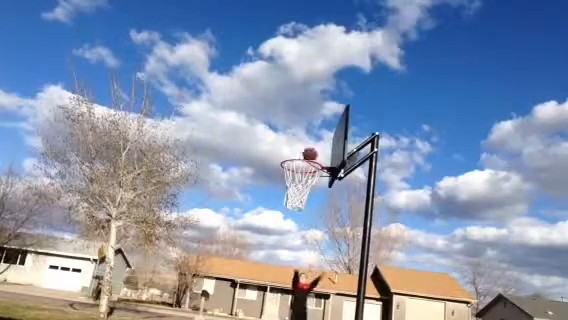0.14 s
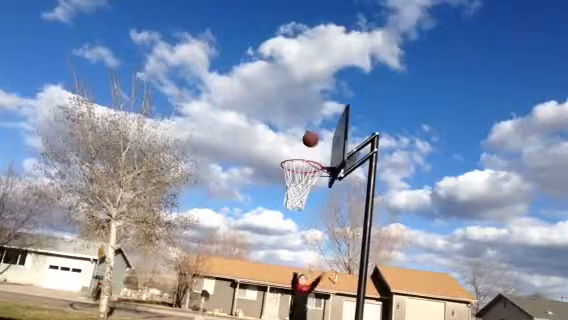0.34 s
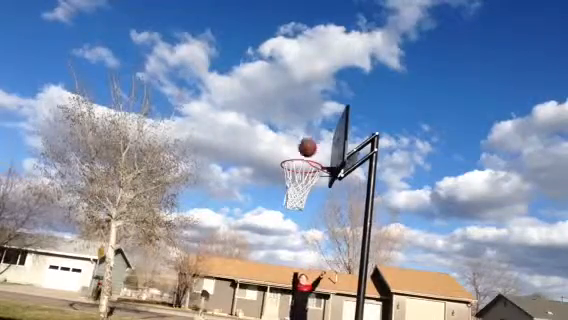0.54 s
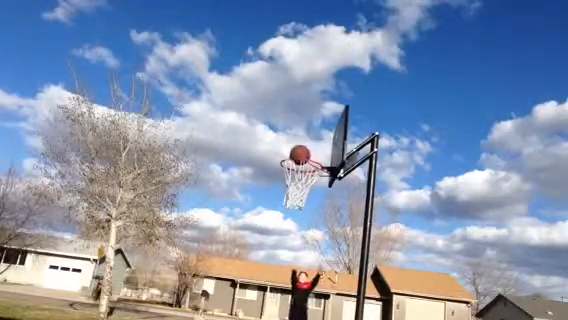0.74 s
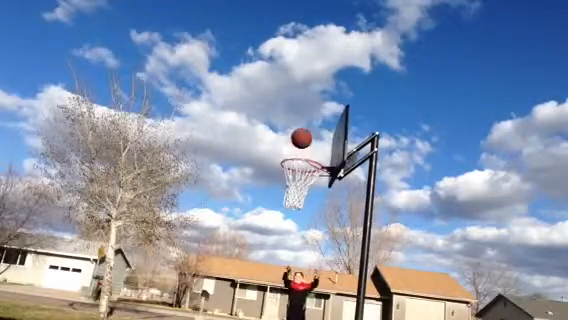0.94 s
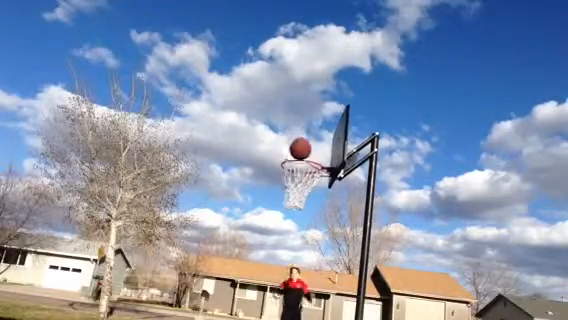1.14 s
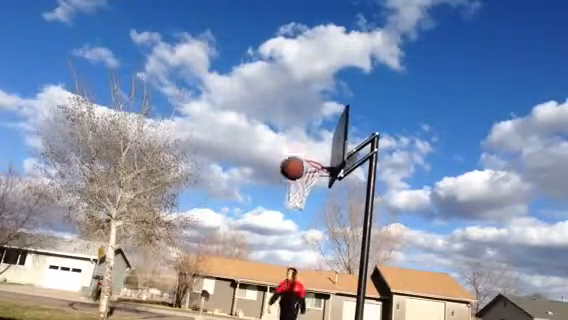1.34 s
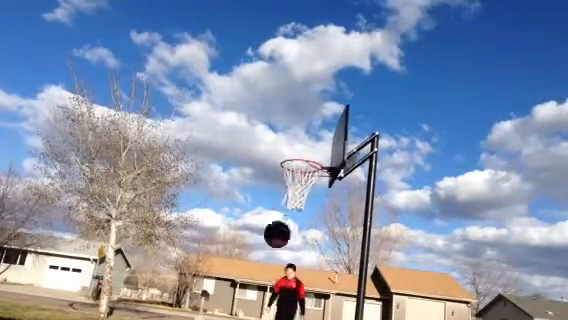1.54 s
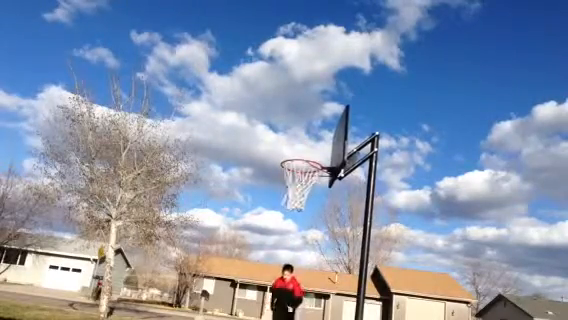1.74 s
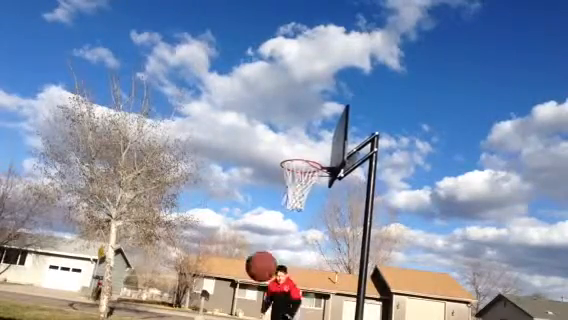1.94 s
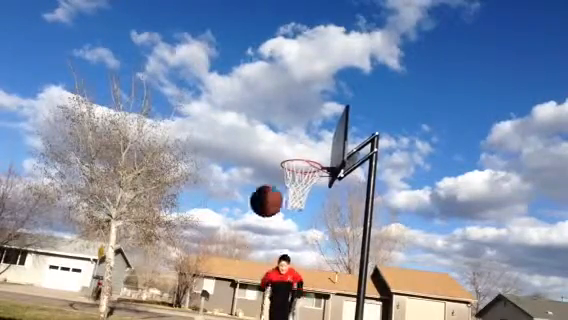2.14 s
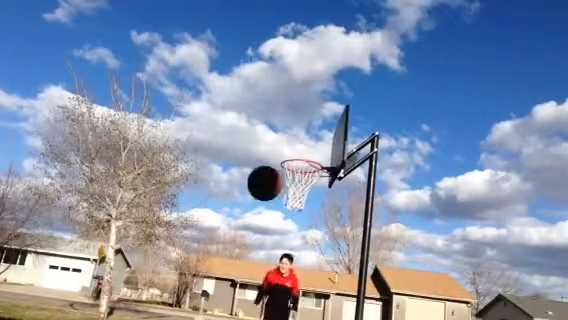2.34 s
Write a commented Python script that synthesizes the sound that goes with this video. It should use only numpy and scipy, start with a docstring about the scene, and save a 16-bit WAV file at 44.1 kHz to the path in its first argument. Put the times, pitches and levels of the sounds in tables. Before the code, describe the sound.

A basketball hits a hoop and bounces once in a quiet driveway. Shoes scuff at the start. At 0.75 seconds the ball knocks the rim; the backboard rattles and rings, with small squeaks. A softer knock comes at 1.25, a faint net brush at 1.5. At 1.9 comes the loudest sound, a sharp, close bounce on pavement with a short echo. A faint thin squeal, shuffle and jacket rustle follow.

```python
"""A driveway basketball hoop, heard from a microphone close to where the ball lands.
Shoes scuff over quiet outdoor air. The ball knocks the rim, then again more softly; board and
bracket rattle and ring, and a joint squeaks as the frame sways. The ball brushes the net, drops
and bounces once on the pavement, and the houses throw the bounce back. A faint, thin squeal
follows, with a last shuffle of shoes and a rustling jacket."""
import sys
import numpy as np
from scipy import signal
from scipy.fft import rfft, irfft
from scipy.io import wavfile
from scipy.ndimage import uniform_filter1d

SR = 44100
rng = np.random.default_rng(int(sys.argv[2]) if len(sys.argv) > 2 else 0)


def wav_record(signal):
    """Record a signal, one row per channel, as 16-bit PCM in the file named by sys.argv[1]."""
    frames = np.transpose(np.atleast_2d(signal))
    bounded = np.clip(frames, -1, 1)
    # unit amplitude maps onto the largest positive 16-bit level
    quanta = np.round(bounded * 32767).astype(np.int16)
    wavfile.write(sys.argv[1], SR, quanta)


N = 110250


def amp(db):
    return 10 ** (np.asarray(db) / 20)


def clock():
    return np.arange(N) / SR


def unit(x):
    """Scale to an energy of one."""
    return x / np.sqrt(np.sum(x ** 2) + 1e-18)


def loudest(x, db):
    """Set the level of the loudest 10 ms."""
    return x * amp(db) / np.sqrt(uniform_filter1d(x ** 2, SR // 100, mode="constant").max())


def at(x, start):
    """Place a sound at a time in an otherwise silent track."""
    return np.pad(x, (int(start * SR), N))[:N]


def through(x, response):
    return signal.fftconvolve(x, response)[:N]


def fade(t60):
    return amp(-60 * clock() / t60)


def swell(start, rise, t60):
    """Linear attack, exponential release."""
    age = clock() - start
    return np.clip(age / rise, 0, 1) * amp(-60 * np.maximum(age - rise, 0) / t60)


def wander(rate_hz):
    """Smooth random drift with a spread of one."""
    hold = int(SR / rate_hz)
    stairs = np.repeat(rng.standard_normal(N // hold + 1), hold)
    drift = uniform_filter1d(uniform_filter1d(stairs, hold), hold)[:N]
    return drift / drift.std()


def colour(points, size=4096):
    """Causal response with a spectrum of (frequency [Hz], gain [dB]) points."""
    hz, db = np.array(points).T
    log_hz = np.log(np.arange(size // 2 + 1) * SR / size + 1)
    gain = amp(np.interp(log_hz, np.log(hz), db))
    cepstrum = irfft(np.log(gain))
    cepstrum[1:size // 2] *= 2  # fold to minimum phase
    cepstrum[size // 2 + 1:] = 0
    return irfft(np.exp(rfft(cepstrum)))


def ring(hz, t60):
    return np.sin(2 * np.pi * hz * clock()) * fade(t60)


def clicks(per_second=3500, spread_db=1):
    """Dense tiny contacts of uneven size."""
    contacts = (rng.random(N) < per_second / SR) * np.sign(rng.standard_normal(N))
    contacts *= amp(spread_db * rng.standard_normal(N))
    return contacts / contacts.std()


# outdoor rush around the microphone (frequency [Hz], gain [dB])
AIR_COLOUR = [(25, -23), (60, 1.5), (120, -13.5), (170, -3), (250, -2), (383, -5), (600, -6.5), (900, -7),
              (1300, -16.5), (2500, -22), (6000, -33), (15000, -35.5)]


def air(rush_db=-63.5, waver_db=1, hiss_db=-67):
    """A faint, wavering outdoor rush and a steady hiss."""
    rush = through(rng.standard_normal(N), unit(colour(AIR_COLOUR)))
    return amp(rush_db - waver_db * wander(8.9)) * rush + amp(hiss_db) * rng.standard_normal(N)


# echoes off houses and fences (delay [s], mirrored gain [dB], scattered gain [dB])
WALL_ECHOES = [(.031, -12.5, -6.5), (0.04, -15.5, -20.5), (0.079, -18, -15), (0.12, -21.5, -33),
               (0.134, -27.5, -37), (0.172, -29, -34), (.197, -26.5, -26), (.226, -31, -33),
               (.262, -37, -37)]
# what the walls mirror, mostly bass (frequency [Hz], gain [dB])
MIRRORED_COLOUR = [(50, -12), (230, 2.5), (450, -3), (1000, -10), (2500, -3.5), (15000, -30)]
# what the walls scatter, mostly treble (frequency [Hz], gain [dB])
SCATTERED_COLOUR = [(50, -21), (230, -8), (500, -8.5), (1200, -10.5), (2500, -3.5), (6000, -4.5),
                    (15000, -7)]
# diffuse reverberation of the yard (band centre [Hz], gain [dB], t60 [s])
YARD_BANDS = [(59, -41, .5), (198, -14, 0.83), (523, -12, 0.3), (1170, -16.5, 0.47), (2310, -8, 0.52),
              (5000, -8.5, 0.42), (12000, -18.5, 0.29)]


def street_response(smear_t60=0.081):
    """Walls mirror and scatter sound back to the microphone, over a diffuse tail."""
    mirrored = sum(at([amp(db)], delay) for delay, db, _ in WALL_ECHOES)
    smears = sum(amp(db) * unit(swell(delay, 0.0016, smear_t60)) for delay, _, db in WALL_ECHOES)
    scattered = through(rng.standard_normal(N) * smears, colour(SCATTERED_COLOUR))
    spectrum = rfft(rng.standard_normal(N))
    log_hz = np.log(np.arange(N // 2 + 1) * SR / N + 1)
    log_centres = np.log([hz for hz, _, _ in YARD_BANDS])
    tail = 0
    for share, (_, db, t60) in zip(np.eye(len(YARD_BANDS)), YARD_BANDS):
        band = irfft(spectrum * np.interp(log_hz, log_centres, share), N)
        tail += amp(db) * band * unit(swell(0.0086, 0.0057, t60))
    return through(mirrored, colour(MIRRORED_COLOUR)) + scattered + tail


# shoes on the driveway (time [s], thud level [dB], scuff level [dB], rise [s], t60 [s])
FOOTFALLS = [(0.0199, -66, -47.5, 0.00087, .05), (0.03, -46, -42, 0.0057, 0.14),
             (.513, -61, -84, 0.0034, 0.13), (1.467, -54.5, -58, 0.0047, 0.16),
             (2.231, -74, -55, 0.0022, .05), (2.373, -48, -56, .003, .07), (2.385, -68.5, -77, 0.029, 1.5)]
# a sole landing (frequency [Hz], gain [dB])
THUD_COLOUR = [(40, -20), (120, -16.5), (250, 1.5), (450, -8), (900, -25), (3000, -36), (15000, -60)]
# a sole scraping (frequency [Hz], gain [dB])
SCUFF_COLOUR = [(100, -26.5), (400, 5), (800, 2), (1150, 2), (1800, -8), (3000, -17.5), (5500, -18),
                (8000, -35), (15000, -46)]


def steps():
    """Soles thud and scrape on the driveway."""
    weight = sum(amp(db) * swell(start, rise, t60) for start, db, _, rise, t60 in FOOTFALLS)
    scrape = sum(amp(db) * swell(start, rise, t60) for start, _, db, rise, t60 in FOOTFALLS)
    thud = through(rng.standard_normal(N) * weight, unit(colour(THUD_COLOUR)))
    scuff = through(clicks() * scrape, unit(colour(SCUFF_COLOUR)))
    return thud + scuff


# brushes of net cord and clothing (time [s], level [dB], rise [s], t60 [s])
BRUSHES = [(1.528, -56, 0.0064, 0.37), (2.24, -56.5, .002, 0.073), (2.37, -60.5, 0.018, 3.)]
# rubbing cord and cloth (frequency [Hz], gain [dB])
RUSTLE_COLOUR = [(100, -20), (500, 7), (1100, 0.5), (1800, -0.5), (3200, -8), (4800, -10), (7000, -21),
                 (15000, -35)]


def rustles():
    """Net cords brush the falling ball; a jacket rustles."""
    envelope = sum(amp(db) * swell(start, rise, t60) for start, db, rise, t60 in BRUSHES)
    return through(clicks() * envelope, unit(colour(RUSTLE_COLOUR)))


# thin squeal after the bounce (time [s], length [s], level [dB])
SQUEAL_STROKES = [(1.997, 0.14, -60), (2.128, 0.12, -63.5), (2.24, 0.11, -74)]


def squeal(pitch_hz=2830, waver=0.0014):
    """A faint, nearly pure squeal that fades in three strokes."""
    hz = pitch_hz * (1 + waver * wander(120))
    strokes = sum(at(amp(db) * signal.windows.tukey(int(length * SR), 0.5), start)
                  for start, length, db in SQUEAL_STROKES)
    return np.sin(2 * np.pi * np.cumsum(hz) / SR) * strokes


# squeaks of the swaying frame (time [s], length [s], pitch [Hz], level [dB])
JOINT_SLIPS = [(0.77, 0.015, 2405, -28), (0.81, 0.0091, 2360, -49), (1.106, 0.009, 2105, -43),
               (1.125, .011, 2074, -41.5), (1.162, 0.024, 2080, -55), (1.219, 0.015, 2050, -55),
               (1.252, .014, 5670, -63), (1.269, 0.013, 2080, -40), (1.292, 0.019, 2063, -43.5),
               (1.337, 0.023, 2075, -53.5), (1.384, 0.016, 2070, -52.5), (1.433, 0.015, 2073, -55),
               (1.467, 0.02, 2064, -63), (1.702, 0.029, 2395, -62.5)]
# harmonics of a squeak (multiple of the pitch, gain [dB])
SQUEAK_HARMONICS = [(1, -1.5), (2, -22.5), (3, -25)]


def frame_squeaks(rise_s=0.0069, t60=0.07, waver=0.007, rough_db=3):
    """A joint sticks and slips: rough, unsteady tones with weak overtones, each ringing briefly."""
    bend = 1 + waver * wander(250)
    roughness = amp(rough_db * wander(220))
    squeaks = 0
    for start, length, hz, db in JOINT_SLIPS:
        first = int(start * SR)
        span = slice(first, first + int((length + t60) * SR))
        phase = 2 * np.pi * np.cumsum(hz * bend[span]) / SR
        t = np.arange(len(phase)) / SR
        envelope = np.minimum(t / rise_s, 1) * amp(-60 * np.maximum(t - length, 0) / t60)
        tone = sum(amp(gain_db) * np.sin(k * phase) for k, gain_db in SQUEAK_HARMONICS)
        squeaks += at(amp(db) * tone * roughness[span] * envelope, start)
    return squeaks


# modes of rim, board and pole (frequency [Hz], level [dB], t60 [s])
FRAME_MODES = [(180, -16.5, 0.28), (253.16, -11, 0.63), (361.3, -14.5, 0.75), (454, -13, 0.17),
               (550, -28, 0.27), (614, -10.5, 0.21), (789, -10.5, 0.3), (850, -13.5, 0.13),
               (904, -21.5, 0.32), (1066, -24.5, .2), (1300, -18, 0.082), (1573, -21.5, .9),
               (1820, -36, 0.55), (2670, -20.5, .2)]
# rattling of the loose hoop (time [s], board level [dB], bracket level [dB], rise [s], t60 [s])
RATTLE_BURSTS = [(0.755, -37, -57, .002, .15), (0.765, -31, -38, 0.0029, 0.29),
                 (0.799, -27.5, -52, 0.0031, 0.12), (0.821, -35.5, -49, 0.0024, 0.54),
                 (0.89, -29.5, -45, 0.014, 0.3), (.921, -27, -52, 0.011, 0.13),
                 (0.937, -51, -43, 0.0034, 0.12), (0.971, -43, -56, 0.0031, 0.12),
                 (1.029, -52, -75, 0.011, 0.73), (1.106, -52, -70, 0.0059, 0.66),
                 (1.186, -55.5, -64, 0.0037, 0.36), (1.251, -47.5, -60.5, 0.015, 0.34),
                 (1.344, -56.5, -79, 0.0076, 1)]
# hollow clatter of the board (frequency [Hz], gain [dB])
BOARD_COLOUR = [(50, -20.5), (100, 1), (200, 7), (320, -4.5), (450, 7.5), (700, 7.5), (950, 6.5),
                (1200, 0.5), (1600, 2.5), (2500, -6), (4000, -23.5), (8000, -54), (15000, -53)]
# bright chatter of the bracket (frequency [Hz], gain [dB])
BRACKET_COLOUR = [(200, -35), (1500, -21.5), (3000, -2.5), (4200, 3.5), (5700, 0), (7200, -12),
                  (10500, -13), (15000, -26)]
# the ball striking the rim (time [s], level [dB])
RIM_STRIKES = [(0.7548, -34.5), (1.245, -49.5)]
# knock of ball on rim (frequency [Hz], gain [dB])
KNOCK_COLOUR = [(50, -33), (120, -5), (200, 6.5), (400, -5.5), (900, 4), (1600, 1), (3000, -22),
                (6000, -29), (15000, -40)]


def hoop(knock_t60=0.066, knock_ring_db=-8.5, rattle_ring_db=-3):
    """Farther off, the ball knocks the rim; board and bracket rattle and keep the frame ringing."""
    modes = sum(amp(db) * unit(ring(hz, t60)) for hz, db, t60 in FRAME_MODES)
    board_power = bracket_power = 0
    for start, board_db, bracket_db, rise, t60 in RATTLE_BURSTS:
        burst = swell(start, rise, t60)
        board_power += (amp(board_db) * burst) ** 2
        bracket_power += (amp(bracket_db) * burst) ** 2
    board = clicks() * np.sqrt(board_power)
    bracket = clicks() * np.sqrt(bracket_power)
    sound = through(board, unit(colour(BOARD_COLOUR))) + through(bracket, unit(colour(BRACKET_COLOUR)))
    sound += amp(rattle_ring_db) * through(board, modes)
    for start, db in RIM_STRIKES:
        contact = unit(rng.standard_normal(N) * fade(knock_t60))
        contact[0] += 1  # a sharp push ahead of the gritty tail
        knock = unit(through(contact, colour(KNOCK_COLOUR))) + amp(knock_ring_db) * unit(modes)
        sound += at(loudest(knock, db), start)
    return sound


# shell and enclosed air of the ball (frequency [Hz], relative level [dB], t60 [s])
BALL_RESONANCES = [(156.7, -2.5, 0.042), (237.3, 2.5, 0.05), (405.6, -4.5, 0.047), (612, -1.5, 0.061),
                   (790, -3.5, 0.057), (944, -8, 0.074), (1084, -9, .04), (1520, -17, 0.057),
                   (1670, -6.5, .035), (1900, -22, 0.036), (2050, -16, 0.031), (2260, -21, 0.043),
                   (2683, -16, .04), (4400, -31, 0.038)]
# the slap as it reaches the microphone directly (frequency [Hz], gain [dB])
SLAP_COLOUR = [(30, -31), (70, -25), (130, -17.5), (400, 6.5), (900, 8.5), (1250, -8.5), (1800, 8),
               (3500, -6.5), (4600, -8), (5600, -22), (8000, -23), (11000, -33), (15000, -34)]
# grit crunching under the ball (frequency [Hz], gain [dB])
GRIT_COLOUR = [(100, -26), (500, -5), (1100, 7.5), (1800, 5), (3000, 0), (4600, -12.5), (5600, -23.5),
               (8000, -29), (11000, -30), (15000, -41)]
# the part of the slap that spreads sideways to the houses (frequency [Hz], gain [dB])
SIDEWAYS_SLAP = [(50, -4), (130, -2), (400, 7.5), (900, 7), (1250, 5), (1800, 3), (2800, -7), (4200, -11.5),
                 (6000, -18), (8000, -27), (11000, -24.5), (15000, -36)]
# the share of the ball's ring that spreads sideways (frequency [Hz], gain [dB])
SIDEWAYS_RING = [(100, 1), (280, -1), (450, 1.5), (620, -19), (1000, -3), (1700, -9), (5000, -4)]


def bounce(start=1.876, contact_s=0.0013, grit_t60=0.083):
    """The ball slaps gritty pavement and rings; returns the close sound and what reaches the walls."""
    modes = sum(amp(db) * ring(hz, t60) for hz, db, t60 in BALL_RESONANCES)
    body = loudest(modes * np.minimum(clock() / contact_s, 1), db=-16)
    slap = loudest(at(colour(SLAP_COLOUR), 0), db=-25.5)
    crunch = rng.standard_normal(N) * fade(grit_t60)
    grit = loudest(through(crunch, colour(GRIT_COLOUR)), db=-25)
    side_slap = loudest(at(colour(SIDEWAYS_SLAP), 0), db=-20.5)
    side_ring = through(body, colour(SIDEWAYS_RING))
    return at(body - slap + grit, start), at(side_ring + side_slap, start)


def scene(squeak_send_db=-7):
    """Hoop, ball and shoes reach one microphone directly and by way of the street."""
    far = hoop() + steps() + rustles()
    squeaks = frame_squeaks()
    close, sideways = bounce()
    echoes = through(far + sideways + amp(squeak_send_db) * squeaks, street_response())
    return (far + squeaks + close + squeal() + echoes + air())[None]


def record(dry, low_cut_hz=105, top_hz=15300):
    """The recorder thins the deep bass and cuts the top of the treble."""
    low_cut = signal.butter(4, low_cut_hz, "high", fs=SR, output="sos")
    high_cut = signal.ellip(10, 0.2, 70, top_hz, fs=SR, output="sos")
    return signal.sosfilt(high_cut, signal.sosfilt(low_cut, dry))


dry = scene()
out = record(dry)
wav_record(out)
```